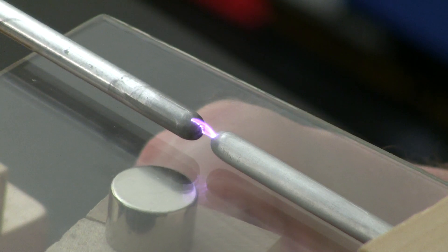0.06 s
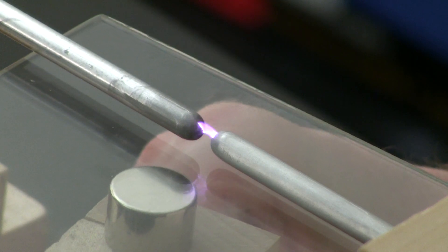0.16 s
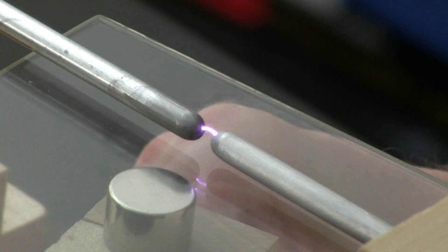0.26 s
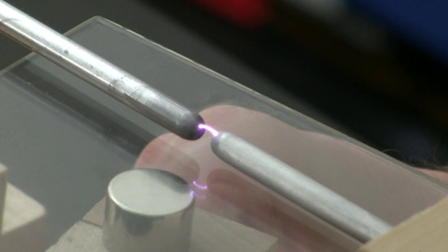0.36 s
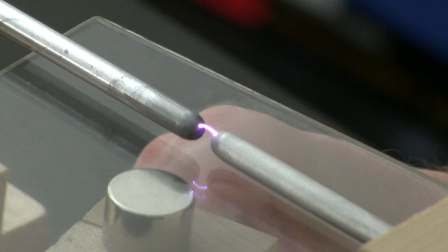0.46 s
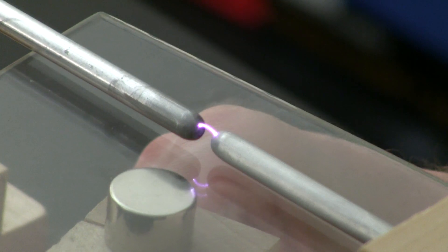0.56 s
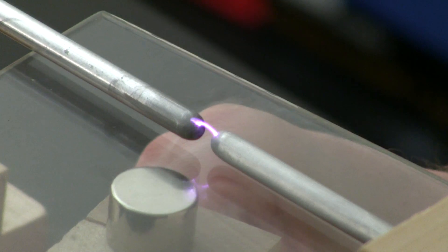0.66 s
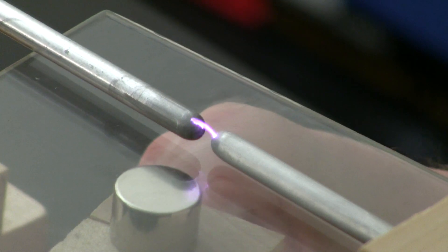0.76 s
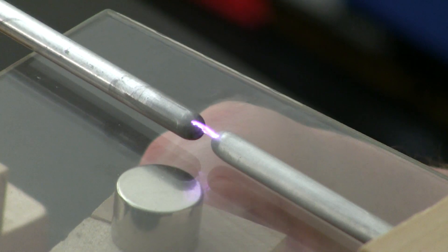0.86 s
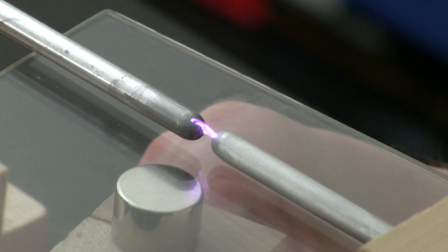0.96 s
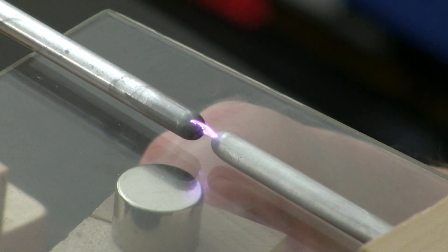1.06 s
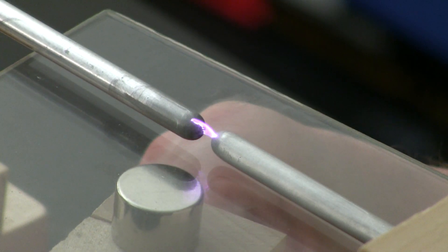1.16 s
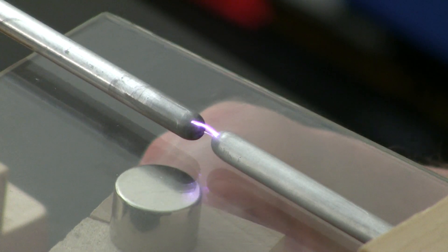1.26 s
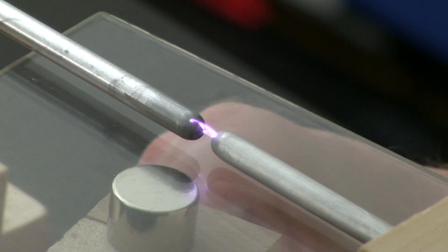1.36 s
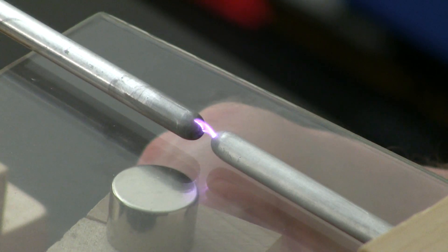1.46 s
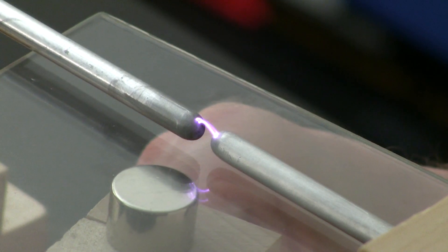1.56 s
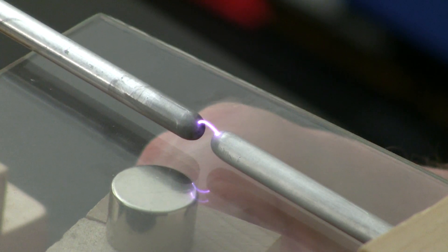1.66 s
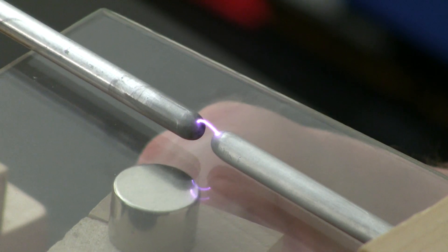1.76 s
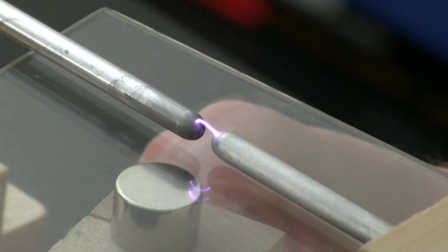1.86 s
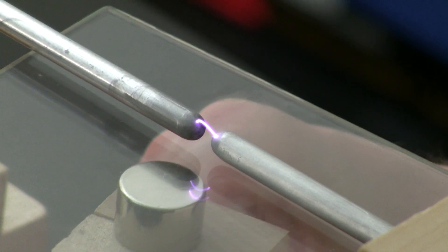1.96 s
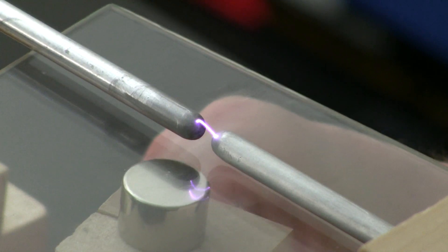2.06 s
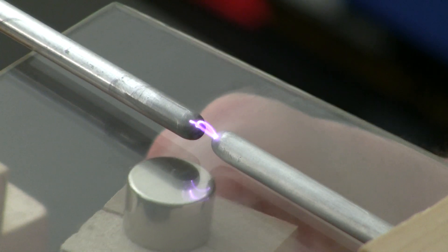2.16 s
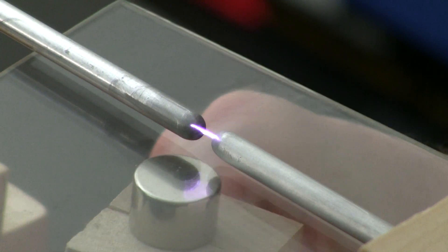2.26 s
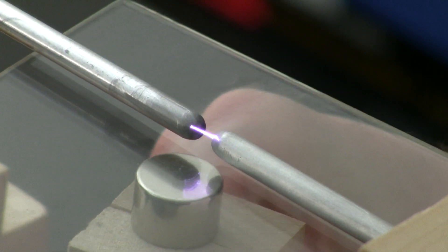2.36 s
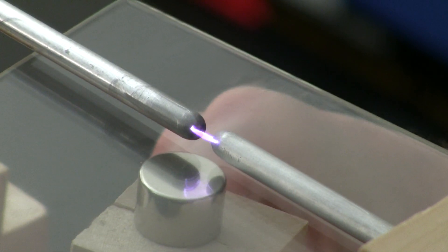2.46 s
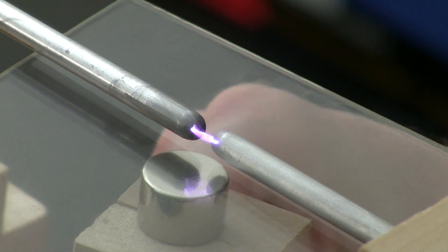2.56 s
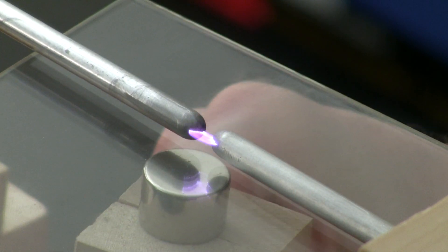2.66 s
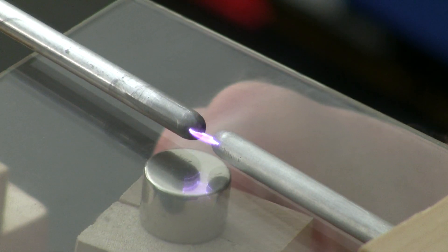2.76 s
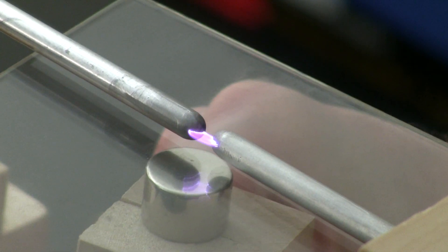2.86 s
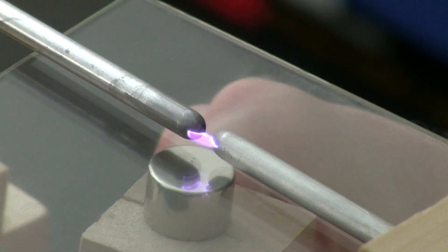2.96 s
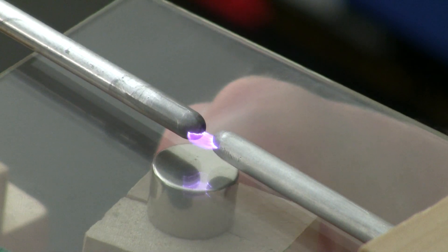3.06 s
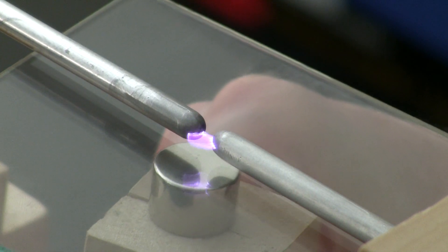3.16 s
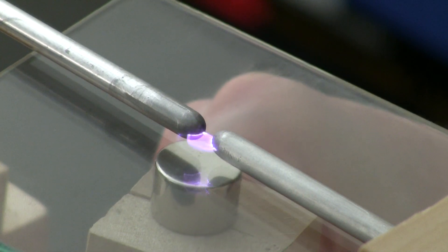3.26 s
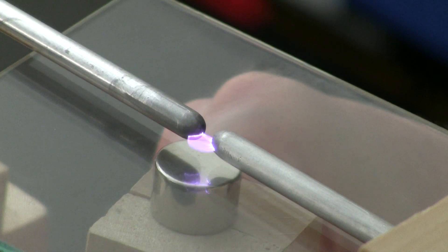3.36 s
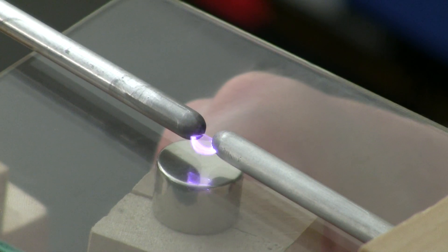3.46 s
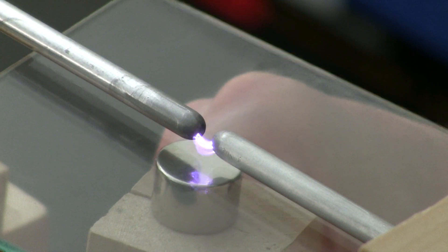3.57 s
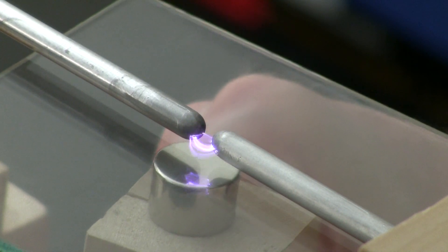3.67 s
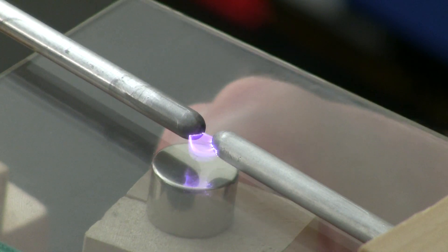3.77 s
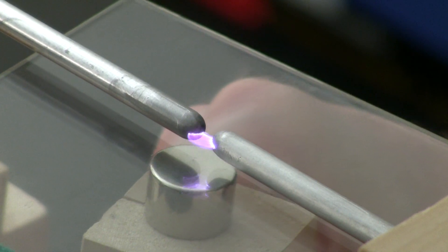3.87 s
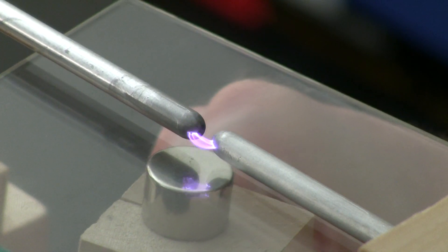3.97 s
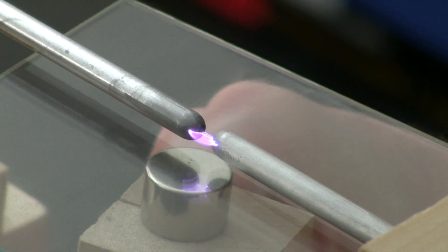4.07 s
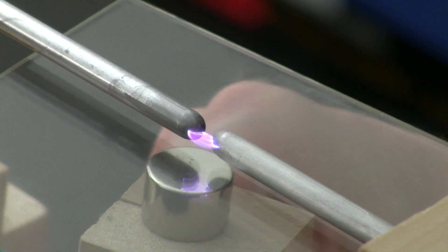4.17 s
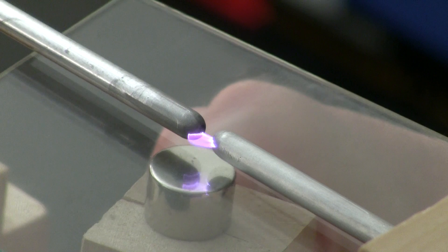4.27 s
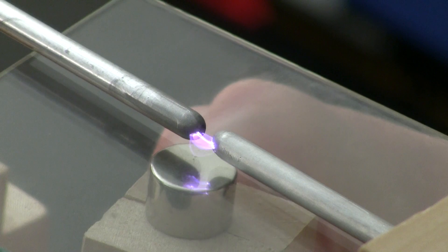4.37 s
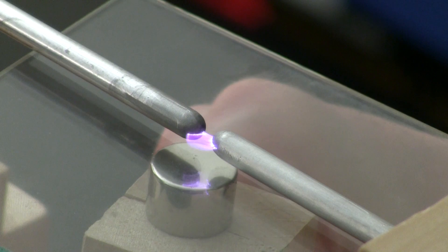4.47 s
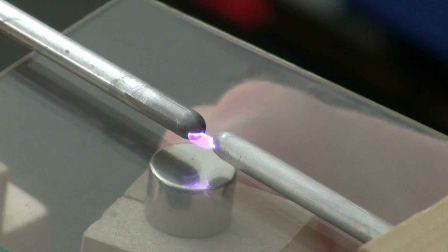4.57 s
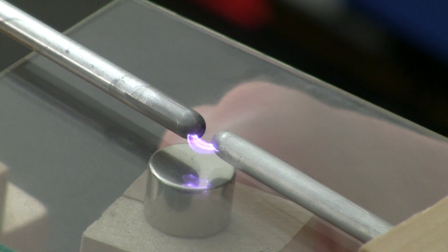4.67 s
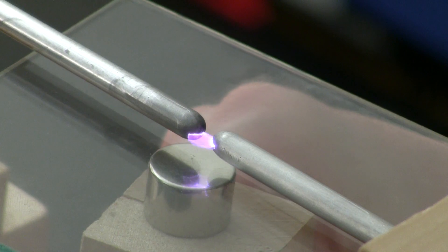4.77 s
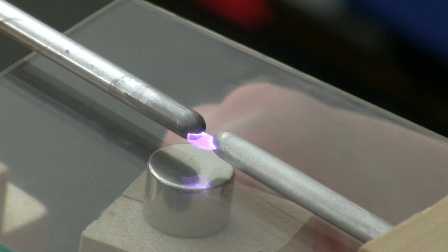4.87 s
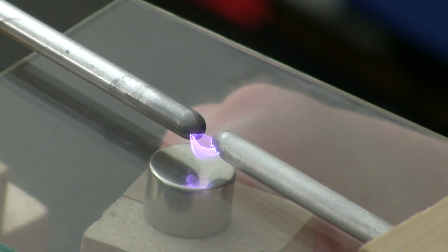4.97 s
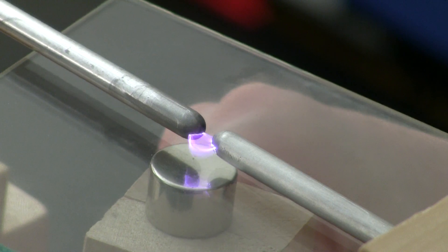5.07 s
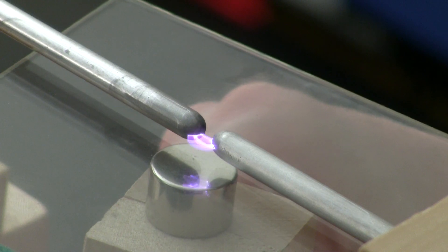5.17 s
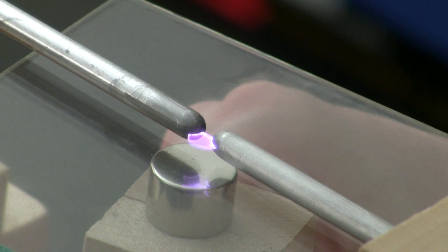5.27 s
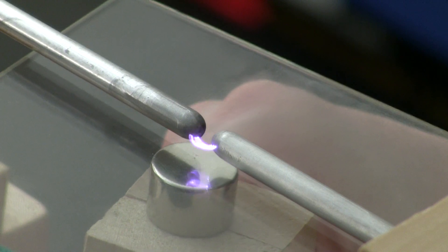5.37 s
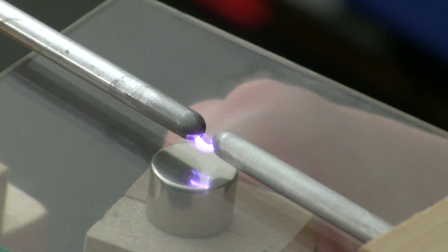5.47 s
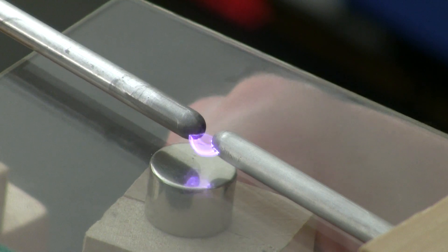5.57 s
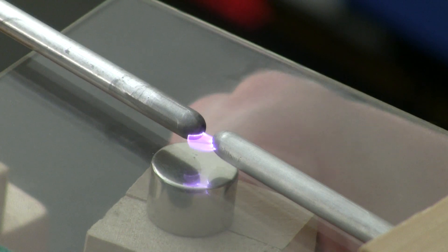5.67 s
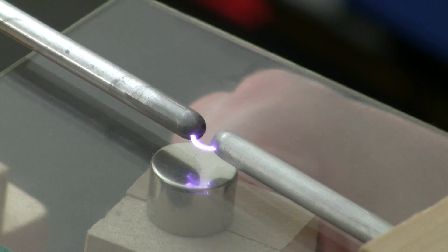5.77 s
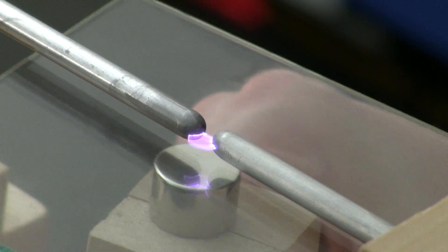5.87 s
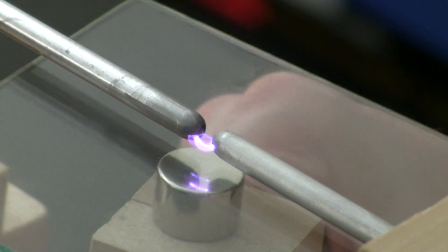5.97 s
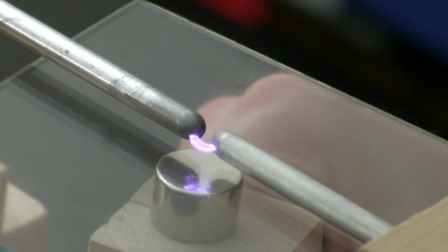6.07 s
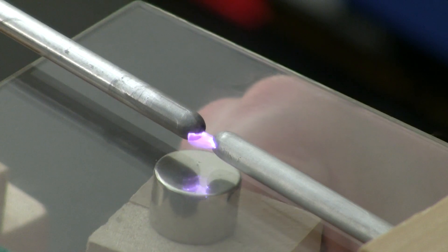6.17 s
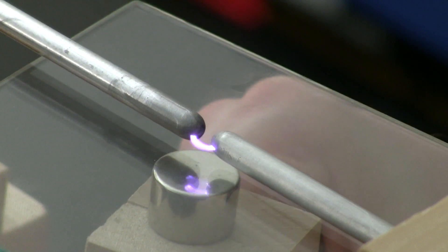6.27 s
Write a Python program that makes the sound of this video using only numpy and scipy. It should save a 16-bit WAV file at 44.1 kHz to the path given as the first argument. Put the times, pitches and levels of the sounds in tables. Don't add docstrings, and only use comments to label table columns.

```python
import sys
import numpy as np
from scipy import signal
from scipy.fft import rfft, irfft
from scipy.io import wavfile

SR = 44100
rng = np.random.default_rng(int(sys.argv[2]) if len(sys.argv) > 2 else 0)


def linear_from_db(decibels):
    return 10 ** (np.asarray(decibels, float) / 20)


def to_wav(s):
    ch = np.atleast_2d(s).T
    pcm = np.round(np.clip(ch, -1, 1) * 32767)
    wavfile.write(sys.argv[1], SR, pcm.astype(np.int16))


N = 278271
LEAD = 4096


def sparks(flutter, jitter, uneven_db):
    rate_hz, level = arc_controls(fade_ms=1.15, small_when_fast=1.4)
    rough = flutter * (rate_hz / 4000) ** 2
    rate_hz = rate_hz * np.exp(np.minimum(rough, .07) * drift(800, count=N + LEAD))
    turns = np.cumsum(rate_hz / SR)
    chance = rng.standard_normal((N // 3, 2))[:int(turns[-1])].clip(-2, 2)
    spark_turn = np.arange(len(chance)) + jitter * chance[:, 0]
    at = np.interp(spark_turn, turns, np.arange(N + LEAD))
    whole = at.astype(int)
    size = level[whole] * np.sqrt(SR / rate_hz[whole]) * linear_from_db(uneven_db * chance[:, 1])
    lit = size > 0
    at, whole, size = at[lit], whole[lit], size[lit]
    taps = whole[:, None] + np.arange(-8, 9)
    click = np.sinc(taps - at[:, None]) * np.hanning(19)[1:-1]
    out = np.zeros(N + LEAD + 9)
    np.add.at(out, taps, size[:, None] * click)
    out = out[:N + LEAD]
    shelf = linear_from_db(-7.0) * passed(out, [1400, 2700], "band", order=2)
    out = passed(out, 3200, "high", order=6) + shelf
    out = bell(out, 3870, 800, -3.5)
    return signal.lfilter([.45, -.5, 1], [1, -.5, .45], out)


def arc_controls(fade_ms, small_when_fast):
    rate_hz, level = np.full(N + LEAD, 4607.0), np.zeros(N + LEAD)
    rows = long_bursts() + snaps()
    spread = rng.standard_normal(len(rows))
    for (s, ms, db, *hz), tune in zip(rows, spread):
        start = LEAD + round(s * SR)
        count = min(round(ms * SR / 1000), N + LEAD - start)
        t_ms = np.arange(count) * 1000 / SR
        off_tune = 1 + (ms < 5) * .065 * tune
        glide = np.interp(t_ms / ms, [0, .5, 1], hz) * off_tune
        fade_in = np.minimum(1, (t_ms + .3) / fade_ms)
        fade_out = np.minimum(1, (ms - t_ms + .3) / .9)
        weaker = (np.mean(glide) / glide) ** small_when_fast
        rate_hz[start:start + count] = glide
        level[start:start + count] = linear_from_db(db) * fade_in * fade_out * weaker
    return rate_hz, level


def long_bursts():
    # t/s, length/ms, level/dB, start f/Hz, end f/Hz
    gliding = [(0.2759, 7.1, -12.5, 5594, 4200), (0.7681, 4.46, -9.5, 5380, 5000),
               (0.9074, 10.6, -11.5, 3880, 5800), (0.9337, 5.6, -10, 4000, 2920),
               (1.3221, 13.6, -14, 4800, 6550), (1.5726, 5.4, -14, 6200, 5150), (2.2434, 0.62, -6, 5545, 4000),
               (2.247, 7.1, -13.5, 6392, 3900), (2.2998, 5.9, -12, 6005, 2750),
               (2.5413, 9.5, -11.5, 3950, 3500), (2.5728, 13.8, -12, 4098, 3600),
               (2.5936, 14.5, -13.5, 5240, 3660), (2.6163, 10, -12.5, 4760, 3500),
               (2.6636, 18.3, -14, 5175, 3550), (2.6876, 9.6, -17, 8140, 5600), (2.709, 15.3, -14, 5570, 3460),
               (3.4941, 26.8, -18, 6004, 6800), (3.5321, 19, -15.5, 4700, 5170),
                (3.581, 4, -12.5, 7160, 7700), (3.62, 27, -16.5, 5426, 4200),
                (3.7744, 15.2, -15.5, 7020, 8600), (3.918, 7.1, -16, 8940, 10100),
                (4.1054, 9.8, -15.5, 5410, 3700), (4.7364, 17, -15, 5212, 7500),
                (5.4994, 10.7, -16, 5627, 7200), (5.5242, 16.7, -18.5, 4798, 8000),
                (6.0338, 13.6, -16, 5965, 7100)]
    # t/s, length/ms, level/dB, middle f/Hz, end f/Hz
    blown = [(3.4718, 15, -12.5, 3988, 3600), (3.6027, 13, -14, 4000, 3300),
             (3.7328, 13.2, -13, 4520, 3270), (3.7919, 12.8, -16.5, 4320, 4700),
             (3.8322, 7.2, -13.5, 3258, 3900), (3.8451, 20, -15.5, 3585, 4300),
             (4.0197, 13.1, -13, 3716, 4400), (4.068, 32.7, -16.5, 5350, 3580),
             (4.1368, 10.8, -14, 4027, 4300), (4.2628, 9.6, -15, 3315, 3160), (4.2777, 42, -16, 5000, 6600),
             (4.4255, 16.8, -14, 4840, 3730), (4.687, 23, -16, 4138, 8050), (4.7637, 21, -13.5, 3880, 4800),
             (5.0121, 12.6, -13.5, 3538, 3020), (5.0316, 21.4, -14.5, 3270, 4740),
             (5.147, 14.2, -14, 4800, 3660), (5.3779, 13.7, -12, 3570, 3590),
             (5.63, 10.5, -13.5, 3558, 3700), (5.6475, 28, -17.5, 4164, 5900),
             (5.7844, 17.2, -14.5, 5190, 3500), (6.0118, 15.5, -14.5, 4915, 3700),
             (6.1237, 14, -14, 4146, 3600), (6.296, 17, -13.5, 4600, 3100)]
    # t/s, length/ms, level/dB, middle f/Hz, end f/Hz
    climbing = [(3.5544, 25, -18, 7540, 12100), (3.653, 16.4, -21.5, 6976, 11700),
                (3.751, 18.7, -18.5, 5954, 8400), (3.8699, 9.1, -17, 5803, 7400),
                (3.8944, 18.2, -19.5, 5533, 7200), (4.0399, 21, -19, 7320, 5600),
                (4.4476, 15.2, -18, 6730, 8400), (4.7137, 14.2, -21.5, 6520, 10500),
                (4.801, 14, -20, 7886, 9100), (5.0589, 20.2, -23.5, 6310, 8600),
                (5.1685, 18, -17.5, 7030, 8500), (5.1933, 21.7, -18.5, 5370, 9140),
                (5.4427, 29, -20, 5183, 9570), (5.481, 15.4, -19, 5236, 9900),
                (5.545, 8.9, -23, 7046, 10400), (5.684, 19.7, -19, 6384, 7600),
                (5.808, 19.8, -18, 6200, 7800), (5.8369, 17.4, -18.5, 6124, 7870),
                (5.8557, 33.6, -18, 7018, 9700), (6.1442, 23.7, -20.5, 7150, 10700),
                (6.1691, 15.7, -18, 6510, 8800), (6.1912, 25, -19.5, 7930, 12000),
                (5.2165, 30.1, -17.5, 5755, 9000), (5.397, 42.7, -18, 3880, 6100)]
    rows = [(s, ms, db, a, (a + b) / 2, b) for s, ms, db, a, b in gliding]
    rows += [(s, ms, db, 3850, middle, end) for s, ms, db, middle, end in blown]
    return rows + [(s, ms, db, 5000, middle, end) for s, ms, db, middle, end in climbing]


def snaps():
    # t/s, length/ms
    slow = [(-0.008, 4.3), (0.0308, 4.2), (0.0692, 3.3), (0.1097, 4.6), (0.1477, 3.54), (0.1845, 3.9),
            (0.231, 2.7), (0.3163, 3.35), (0.7747, 3.46), (0.8203, 3.6), (0.8643, 5.5), (0.967, 3.5),
            (0.999, 4.1), (1.037, 4.24), (1.076, 4.5), (1.1092, 5.6), (1.1415, 4), (1.1784, 2.6),
            (1.2065, 4.1), (1.246, 5.2), (1.279, 3.54), (1.3645, 3.86), (1.4022, 6.4), (1.439, 3.23),
            (1.4828, 3.8), (1.5254, 3.9)]
    # t/s, length/ms
    nearing = [(2.319, 4.8), (2.3346, 5.6), (2.3497, 2.35), (2.362, 5.5), (2.3769, 3.5), (2.3896, 3.9),
               (2.4, 3), (2.411, 2.74), (2.4208, 2.7), (2.4322, 2.6), (2.4402, 3.4), (2.4516, 2.5),
               (2.4619, 3.8), (2.4731, 4.2), (2.484, 3.4), (2.495, 3.2), (2.5054, 3.9), (2.5148, 5),
               (2.528, 5)]
    start_hz, end_hz = 4607, 3189
    kinds = [(*row, 2, 2.6) for row in slow + nearing]
    kinds += [(*row, 0, 1.4) for row in fast_snaps()]
    rows = []
    for s, ms, extra_db, stretch_ms in kinds:
        hz = end_hz + (start_hz - end_hz) * np.exp(-np.array([0, .5, 1]) * ms / stretch_ms)
        db = -16.5 + extra_db + 1.5 * np.log2(ms)
        rows.append((s, ms, db, *hz))
    return rows


def fast_snaps():
    # t/s, length/ms
    stray = [(2.557, 6.5), (2.6351, 4.4), (2.6474, 6.33), (3.586, 0.95), (3.592, 0.95), (3.5966, 1.94),
             (4.1229, 4.8), (4.475, 0.94), (5.83, 3), (6.052, 1.38), (6.0661, 1.37)]
    # start t/s, end t/s, number of snaps, first/ms, last/ms
    runs = [(2.7333, 2.762, 4, 1.32, 2.4), (2.7616, 2.8882, 14, 3, 4.5), (2.8895, 3.0895, 23, 3.04, 3.2),
            (3.087, 3.22, 16, 3.08, 3.08), (3.2235, 3.373, 22, 1.74, 3.25), (3.3764, 3.471, 15, 1.46, 2.3),
            (3.673, 3.7336, 9, 0.83, 3.5), (3.8056, 3.833, 4, 1.1, 2.8), (3.9285, 4.0172, 13, 1.22, 2.95),
            (4.154, 4.2636, 13, 2.05, 3.3), (4.328, 4.4277, 15, 1.3, 2.7), (4.4808, 4.556, 11, 1.41, 2.96),
            (4.5537, 4.619, 9, 1.94, 2.82), (4.627, 4.6871, 10, 1.62, 1.97), (4.8232, 4.8948, 11, 1.4, 2),
            (4.8944, 4.9428, 6, 4.03, 2.58), (4.9415, 5.0128, 10, 2, 3.2), (5.085, 5.148, 9, 1.17, 3.04),
            (5.252, 5.3757, 20, 1.4, 2.3), (5.566, 5.631, 9, 1.2, 3.5), (5.7041, 5.788, 12, 1.77, 2.47),
            (5.907, 6.0113, 18, 1.4, 2.86), (6.081, 6.1218, 7, 1.46, 1.92), (6.2305, 6.2962, 9, 1.2, 3.5)]
    rows = list(stray)
    chance = rng.standard_normal(size=(len(runs), 2, 30))
    for (s, end, many, first_ms, last_ms), (longer, later) in zip(runs, chance):
        count = round(many)
        ms = np.geomspace(first_ms, last_ms, count) * np.exp(.22 * longer[:count])
        pause = np.exp(.08 * later[:count])
        time_left = end - s - ms.sum() / 1000
        step = ms / 1000 + pause / pause.sum() * time_left
        rows += zip(s + np.cumsum(step) - step, ms)
    return rows


def magnet():
    # t/s, nearness (0 = away, 1 = near), air noise level/dB
    path = [
        (2.2, 0, 1),
        (2.7, 1, 0.5),
        (3.698, 1.3, -2),
        (4.6, 1.3, -0.5),
    ]
    s, near, swell_db = np.transpose(path)
    t = np.arange(-LEAD, N) / SR
    return np.interp(t, s, near), np.interp(t, s, swell_db)


def at_ports(gap):
    # f/Hz, width/Hz, level/dB
    left = [(6200, 5000, 2.5), (9440, 3560, -14), (12380, 1200, 5.5)]
    # f/Hz, width/Hz, level/dB
    right = [(6440, 1870, 3), (10080, 430, -6.5), (15200, 2600, -10)]
    ports = [gap, gap]
    for k, colour in enumerate((left, right)):
        for hz, width_hz, db in colour:
            ports[k] = bell(ports[k], hz, width_hz, db)
    swing = 0.31 * drift(126.0, count=N + LEAD) * passed(gap, [6500, 11500], "band", order=1)
    return np.array(ports) + swing * [[1], [-1]]


def room(x, delay_ms):
    # f/Hz, time to fall 60 dB/s, left-right likeness (1 = same)
    ring = [(1890, 0.6, 1), (5000, 0.36, 0.7), (12700, 0.2, 0.022)]
    t = np.arange(SR // 2) / SR
    white, tail = rng.standard_normal((2, 2, len(t))), 0
    for k, hz in enumerate(1000 * 2. ** np.arange(5)):
        octave = [hz / 2 ** .5, min(hz * 2 ** .5, 20000)]
        mid, side = passed(white[k % 2], octave, "band", order=2)
        alike = np.clip(at_hz(np.array(ring)[:, ::2], hz), 0, 1)
        pair = np.sqrt(1 + alike) * mid + np.sqrt(1 - alike) * side * [[1], [-1]]
        pair = pair * linear_from_db(0.53 * k)
        tail = tail + pair * linear_from_db(-60 * t / at_hz(ring, hz))
    tail = tail * np.clip(t * 1000 / delay_ms - .5, 0, 1)
    tail = tail / np.sqrt(np.sum(tail ** 2) / 2)
    return signal.fftconvolve(x[None], tail, axes=1)[:, :len(x)]


def hum():
    # f/Hz, level/dB
    tones = [(59.6, -62.5), (120, -54.5)]
    t = np.arange(N) / SR
    total = 0
    for hz, db in tones:
        total = total + linear_from_db(db + 2 + 0.26 * drift(11, count=N)) * np.sin(2 * np.pi * hz * t)
    return total * linear_from_db([[-1.1], [.9]])


def air(swell_db):
    # f/Hz, level per Hz/dB
    colour = [(25, -21.5), (45, -5), (300, -5), (600, -8.5), (1000, -14.5), (3000, -23.5), (16000, -28)]
    hz = np.fft.rfftfreq(N, 1 / SR)
    noise = irfft(rfft(rng.standard_normal((2, N))) * linear_from_db(at_hz(colour, hz)), N)
    noise = noise - 0.054 * noise[::-1]
    return linear_from_db(-47.5 + swell_db) * noise / noise.std() * linear_from_db([[-1.1], [1.1]])


def at_hz(points, hz):
    f, value = np.array(points)[:, 0], np.array(points)[:, 1]
    return np.interp(np.log(hz + 1), np.log(f), value)


def drift(hz, count):
    r = np.exp(-2 * np.pi * hz / SR)
    slow = signal.lfilter([1], [1, -2 * r, r * r], rng.standard_normal(count + 20000))[20000:]
    return slow / slow.std()


def bell(x, hz, width_hz, db):
    a, w, k = linear_from_db(db / 2), 2 * np.pi * hz / SR, np.tan(np.pi * width_hz / SR)
    top = [1 + k * a, -2 * np.cos(w), 1 - k * a]
    bottom = [1 + k / a, -2 * np.cos(w), 1 - k / a]
    return signal.lfilter(top, bottom, x)


def passed(x, hz, kind, order):
    return signal.sosfilt(signal.butter(order, hz, kind, fs=SR, output="sos"), x)


def scene():
    near, swell_db = magnet()
    gap = sparks(flutter=.036, jitter=.048, uneven_db=1.8)
    treble = signal.sosfiltfilt(signal.butter(1, 9000, "high", fs=SR, output="sos"), gap)
    gap = gap + 1.15 * near * treble
    echoes = bell(room(gap, delay_ms=1.55), 9960, 2400, -8.5)
    heard = linear_from_db(-3.0) * at_ports(gap) + linear_from_db(-8.5) * echoes
    return heard[:, LEAD:] + air(swell_db[LEAD:]) + hum()


def top_cut(x):
    return signal.sosfilt(signal.butter(12, 17110, fs=SR, output="sos"), x)


def record(dry):
    hz = np.fft.rfftfreq(N, 1 / SR)
    kept_db = np.interp(hz, [15800, 15900, 16500, 16900], [0, -32, -35, -70])
    mix = irfft(rfft(dry) * linear_from_db(kept_db), N)
    return top_cut(mix)


dry = scene()
out = record(dry)
to_wav(out)
```